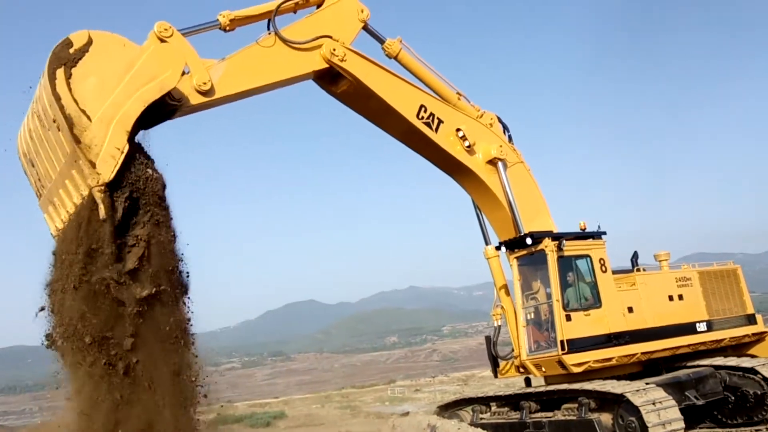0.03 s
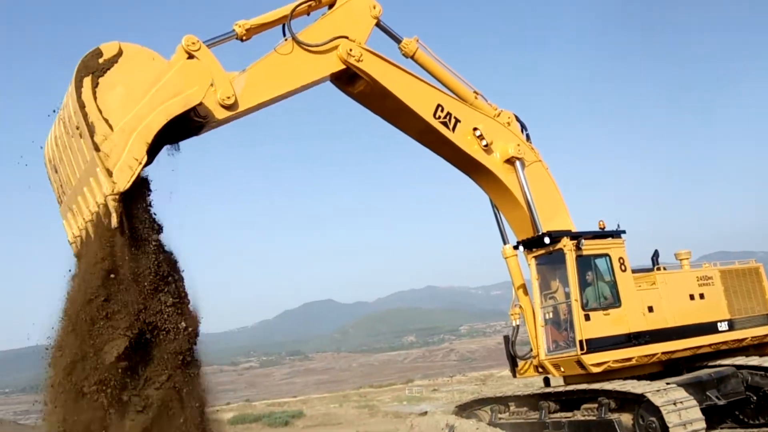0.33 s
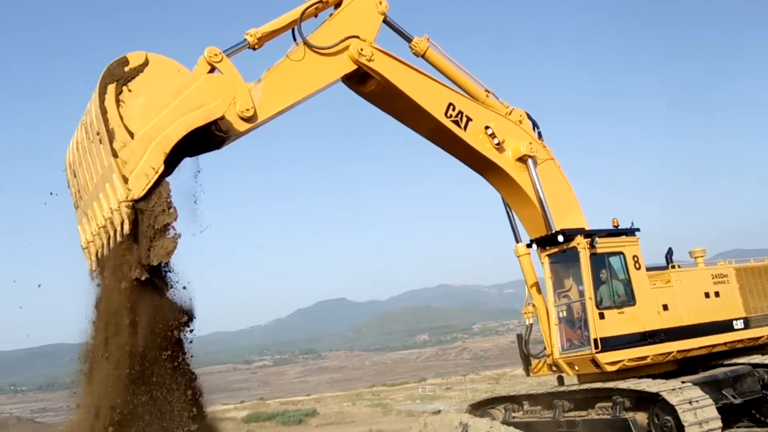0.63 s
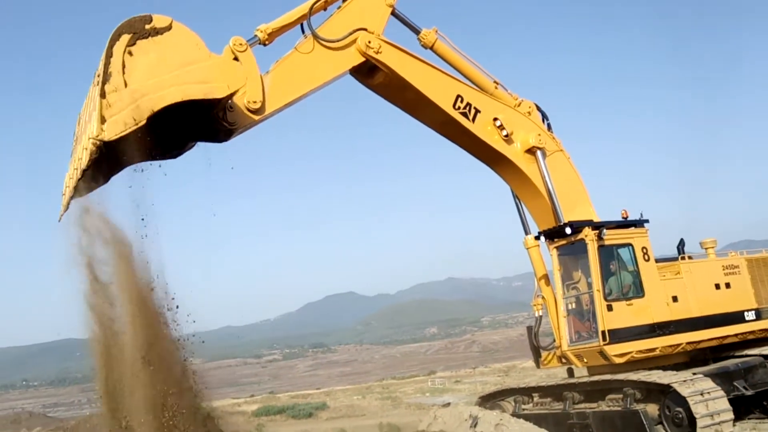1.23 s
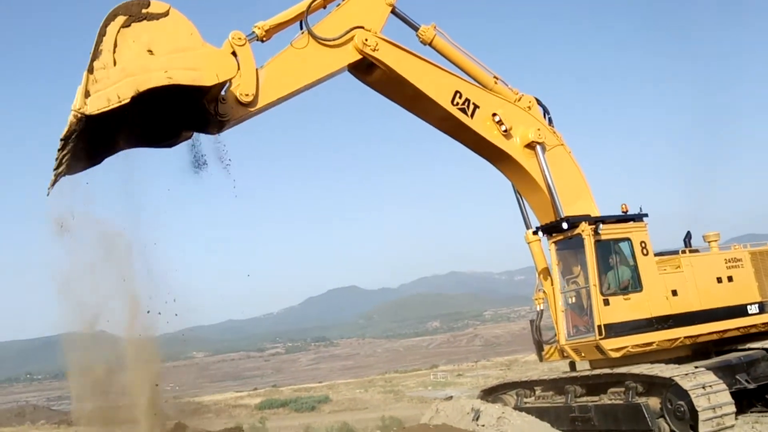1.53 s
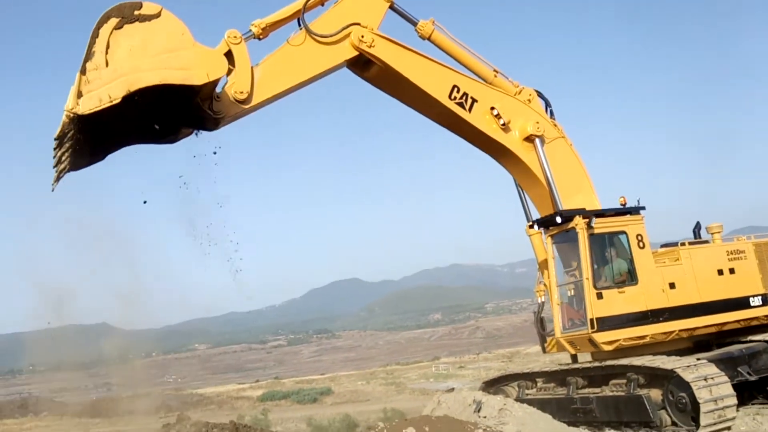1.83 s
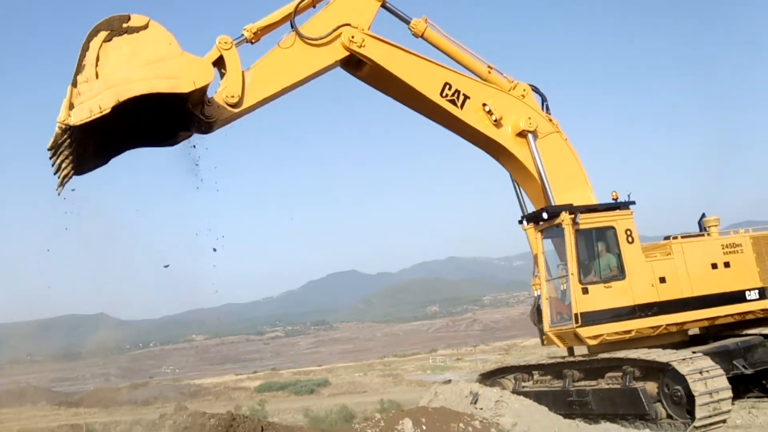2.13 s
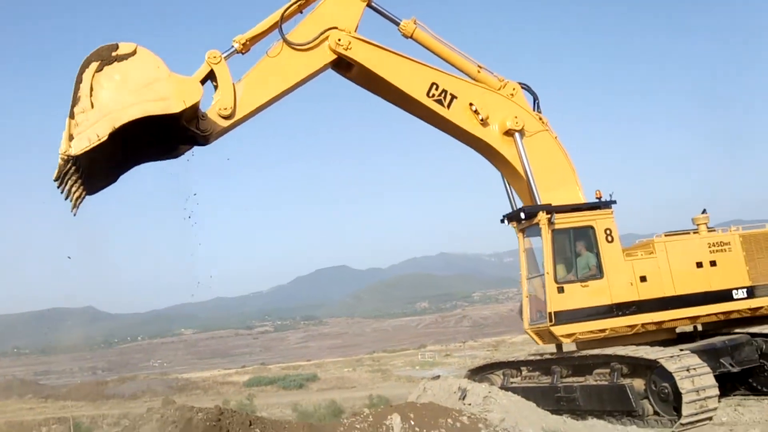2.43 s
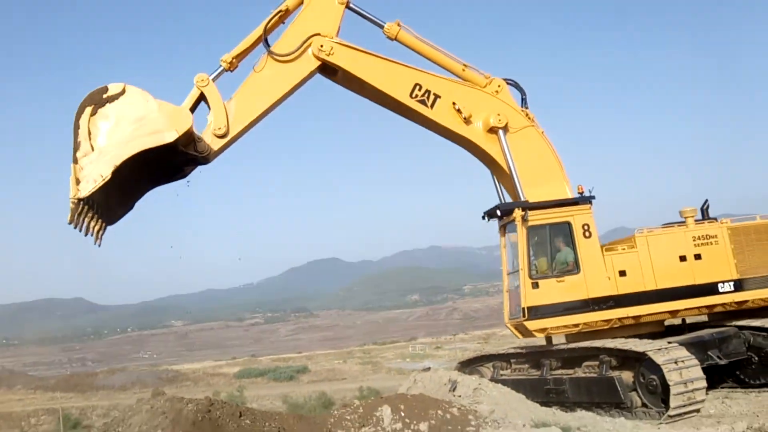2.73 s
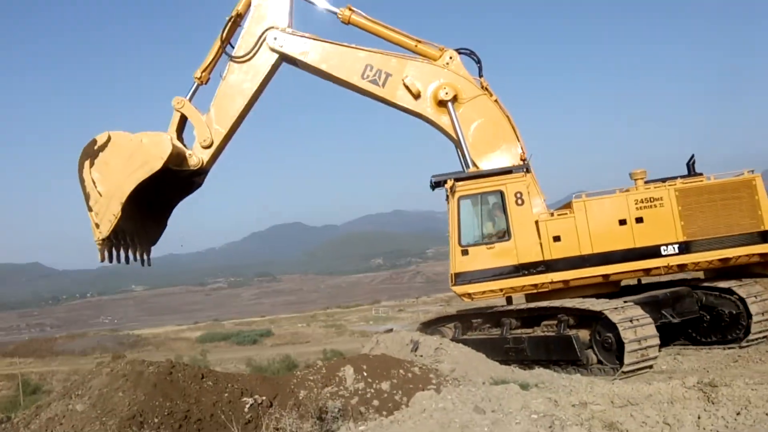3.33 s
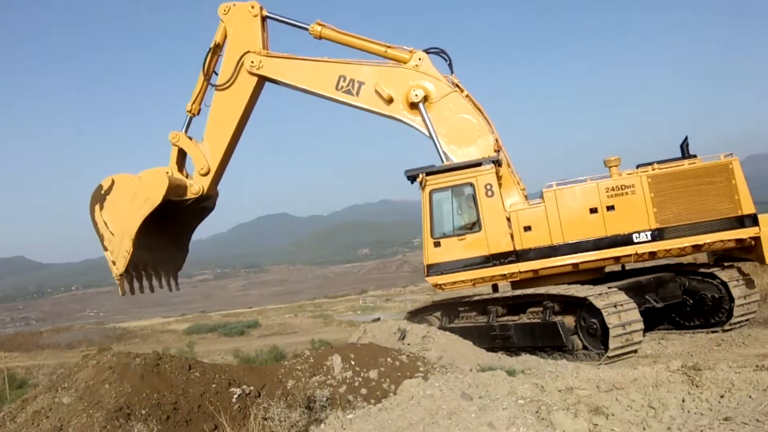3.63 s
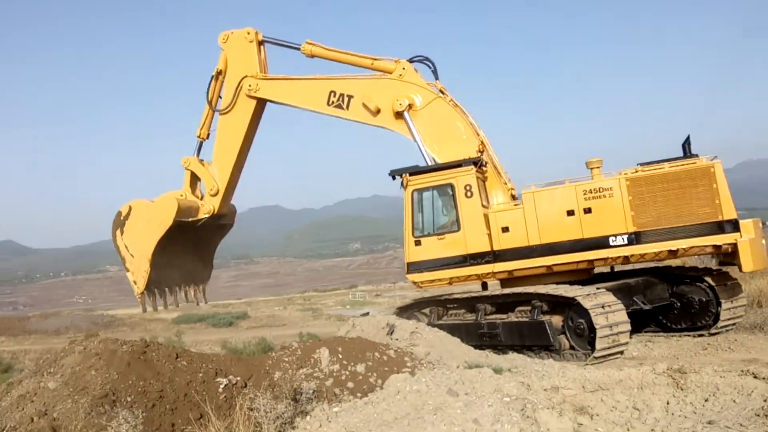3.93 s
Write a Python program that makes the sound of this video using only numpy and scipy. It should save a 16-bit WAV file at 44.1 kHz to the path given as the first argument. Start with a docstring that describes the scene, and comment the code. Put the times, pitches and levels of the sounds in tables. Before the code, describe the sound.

The steady diesel drone and metallic clatter of an excavator carry across open ground. Faint hydraulics whine, a little earth thuds down and the linkage rattles as the engine dips under load, before gusts briefly bump the microphone.

```python
"""A droning, clattering diesel, some way off: a big excavator empties its bucket and swings round.
Exhaust and cooling fan follow the engine, sagging twice under load. The clatter pulses with the firing
and brightens as the machine's side turns near. Loose panels ring, pins rattle, hydraulics whine,
earth thuds onto open ground and the turbo whistles faintly.
Light wind rumbles and thumps on the microphone, over a thin hiss."""
import sys
import numpy as np
from scipy import signal
from scipy.fft import rfft, irfft
from scipy.io import wavfile
from scipy.ndimage import uniform_filter1d

SR = 44100
rng = np.random.default_rng(int(sys.argv[2]) if len(sys.argv) > 2 else 0)


def master_out(mix):
    """Clip the mix to full scale and print it as 16-bit PCM to the path in sys.argv[1]."""
    frames = np.transpose(np.atleast_2d(mix))
    ceiling = np.clip(frames, -1, 1)
    pcm = np.round(ceiling * 32767).astype(np.int16)
    wavfile.write(sys.argv[1], SR, pcm)


N = 176400
TIME = np.arange(N) / SR

# Colour of the microphone hiss. Each row: frequency in Hz, relative level in dB.
HISS_EQ = [(100, -18), (7000, -8), (9000, -10), (13700, -12), (14300, -5.5), (14900, -1), (15400, 0),
           (15800, -4), (16500, -8)]
# Colour of the wind. Each row: frequency in Hz, relative level in dB.
WIND_EQ = [(20, -8.5), (36, -2.5), (52, 1), (72, -3.5), (110, -15.5)]
# Rise and fall of the wind. Each row: time in seconds, level in dB.
WIND_FADER = [(0, -71), (.28, -59.5), (.34, -75), (.42, -61), (.7, -66), (1.02, -65), (1.25, -76),
              (1.45, -69), (1.7, -82), (1.98, -82), (2.08, -63), (2.3, -76), (2.6, -73), (3.15, -61),
              (3.25, -72), (3.36, -60), (4, -66.5)]
# Puffs of wind hitting the microphone. Each row: time in seconds, drive in dB, build-up and collapse
# in seconds, pitch of the low swing in Hz, its 60 dB decay time in seconds.
WIND_PUFFS = [(0.386, -31.5, 0.0025, 0.0019, 85, .07), (0.891, -46, 0.004, 0.0015, 85.5, 0.028),
              (0.998, -43, 0.0018, .001, 85, .04), (3.4109, -16.5, 0.0037, 0.00041, 84.5, 0.084),
              (3.4389, -13.5, 0.0018, 0.00059, 84, 0.04), (3.4883, -17.5, .004, 0.0011, 86, 0.056),
              (3.5669, -20.5, 0.0041, 0.00078, 93, 0.046), (3.6012, -16, 0.0017, 0.00055, 96.7, 0.063),
              (3.6365, -16.5, 0.0024, 0.0016, 91.9, 0.04)]
# Colour of the turbulence in a thump. Each row: frequency in Hz, relative level in dB.
TURBULENCE_EQ = [(250, -1), (500, -3.5), (750, -8.5), (1100, -26), (1600, -39)]
# Colour of the machine's rumble. Each row: frequency in Hz, relative level in dB.
RUMBLE_EQ = [(14, -15.5), (32, -11.5), (50, -7), (85, 0), (125, -3.5), (155, -3.5), (210, -12.5),
             (250, -17.5), (380, -26.5), (600, -44)]
# Rise and fall of the rumble. Each row: time in seconds, level in dB.
RUMBLE_FADER = [(0, -62.5), (.43, -60), (.7, -65), (1.15, -62.5), (1.28, -69.5), (1.48, -63), (1.7, -66.5),
                (1.84, -63.5), (1.95, -66.5), (2.08, -62), (2.33, -63.5), (2.7, -63.5), (3.25, -64.5),
                (3.36, -59.5), (3.75, -64.5), (4, -59)]
# Earth landing. Each row: start in seconds, level in dB, pitch in Hz.
CLODS = [(0.389, -53.5, 188), (0.961, -57.5, 209)]
# A high sheen that comes up near the end. Each row: time in seconds, level in dB.
SHEEN_FADER = [(0, -108), (2.8, -102), (3.15, -97), (3.22, -84), (3.3, -97.5), (3.55, -90), (3.7, -86),
               (3.82, -92), (3.92, -85), (4, -79)]
# The turbo's whistle. Each row: time in seconds, pitch in Hz, level in dB.
TURBO_GLIDE = [(0, 8800, -109), (.3, 8440, -102), (.9, 8500, -116), (1.55, 8800, -104), (1.85, 9000, -112),
               (2.05, 9100, -101), (2.28, 9400, -108), (2.65, 8800, -104), (3, 8233, -116)]
# Whines of hydraulics and gears. Each row: centre and length in seconds, pitch in Hz, level in dB.
ARM_WHINES = [(0.044, 0.099, 1615, -72), (0.148, .25, 2760, -86), (0.438, 0.084, 1163, -73.5),
              (0.465, 0.076, 2724, -78), (0.675, 0.14, 764, -81), (0.86, 0.51, 565, -82),
              (1.0, 0.72, 1720, -73.5), (1.132, 0.12, 775, -81.5), (1.27, 0.13, 1357, -73),
              (1.34, 0.07, 1141, -73.5), (1.386, 0.086, 528, -69.5), (1.385, 0.13, 590, -73),
              (1.974, 0.081, 603, -73.5), (2.034, 0.16, 2659, -80), (2.02, 0.2, 2160, -73.5),
              (2.09, .09, 517, -74.5), (2.525, 0.28, 1646, -66.5), (2.62, 0.15, 2724, -77.5),
              (2.849, 0.27, 780, -79), (2.93, 0.21, 2649, -76), (3.017, 0.13, 2358, -76),
              (3.11, .17, 580, -71.5), (3.292, 0.063, 2842, -75), (3.32, 0.11, 2659, -78),
              (3.367, 0.15, 690, -69), (3.47, 0.076, 1163, -69), (3.796, 0.14, 1184, -76),
              (3.87, 0.36, 585, -74), (3.92, 0.083, 1647, -67.5)]
# Rattles of the linkage. Each row: start in seconds, level in dB, pitch in Hz.
PIN_RATTLES = [(1.7, -61, 1600), (1.735, -64.5, 1850), (2.29, -69.5, 2650), (2.315, -61.5, 1750)]
# Ringing modes of loose panels and links. Each row: pitch in Hz, relative level in dB.
PANEL_RINGS = [(1160, -5), (1355, 1), (1630, -3), (1740, -1), (1890, -3.5), (2110, -2), (2660, -3.5),
               (2775, -9)]
# Engine speed, sagging twice. Each row: time in seconds, firing rate in Hz.
FIRING_RATE = [(0, 192.2), (0.35, 193.3), (0.8, 190.4), (1, 189), (1.2, 185.4), (1.38, 177.9),
               (1.55, 179.8), (1.8, 185), (2.1, 175.5), (2.45, 185.9), (2.75, 189.6), (3.1, 193.8),
               (3.6, 195.1), (4, 198.1)]
# Rise and fall of the fan tone. Each row: time in seconds, level in dB.
FAN_FADER = [(0, -56), (.5, -56), (.95, -57.5), (1.18, -57), (1.26, -63), (1.42, -62.5), (1.49, -54),
             (1.61, -64), (1.76, -59.5), (1.83, -53.5), (1.92, -65.5), (2.19, -55), (2.3, -61),
             (2.48, -54.5), (2.75, -57.5), (3.1, -56), (4, -58)]
# The exhaust's chord. Each row: multiple of the firing rate, level in dB before the swell.
EXHAUST_PARTIALS = [(.5, -80.5), (1, -66), (1.5, -82), (2, -87.5), (3.35, -93.5), (4, -90)]
# Swell of the exhaust. Each row: time in seconds, gain in dB.
EXHAUST_FADER = [(0, -2), (.5, 0.5), (1.05, 1), (1.4, -4.5), (1.8, -1.5), (2.2, -5), (2.6, -1), (2.95, 3.5),
                 (3.3, 0), (4, 2)]
# Drive of clatter and panels, dipping twice near the end. Each row: time in seconds, base level in dB.
SHAKE_FADER = [(0, -66), (.45, -67), (.55, -66.5), (.75, -67), (1.25, -66.5), (1.45, -66.5), (1.66, -66.5),
               (1.75, -65.5), (1.9, -66.5), (2.2, -65), (2.65, -65), (2.9, -65), (3.415, -63.5),
               (3.435, -66.5), (3.46, -67.5), (3.485, -63.5), (3.595, -62.5), (3.64, -66), (3.7, -62.5),
               (4, -64)]
# Colour of the clatter from the front. Each row: frequency in Hz, relative level in dB.
FRONT_EQ = [(210, -33), (350, -6), (378, -5.5), (424, -9), (470, -11.5), (534, -6), (615, -8.5),
            (775, -9.5), (916, -14), (1140, -1.5), (1240, -4.5), (1350, 1), (1480, -0.5), (1730, 1.5),
            (1960, -4), (2160, -5), (2370, -9), (2620, -9), (2770, -6), (3060, -19), (3660, -21.5),
            (5880, -22), (7500, -31.5), (9750, -86), (16500, -120)]
# Colour of the clatter from the side. Each row: frequency in Hz, relative level in dB.
SIDE_EQ = [(210, -43), (350, -8), (393, -8.5), (430, -8.5), (464, -4.5), (521, -12), (585, -1.5),
           (639, -3.5), (785, -5.5), (881, -19), (964, -5.5), (1150, 0), (2030, -2), (2760, -11),
           (2940, -11), (3430, -25), (4160, -25.5), (5170, -23), (7500, -34), (9750, -75), (16500, -120)]
# The clatter's bright edge, dulling during the late thumps. Each row: time in seconds, gain in dB.
EDGE_FADER = [(0, -.5), (2.2, -1), (3.33, 3.5), (3.45, -3), (3.63, -5.5), (3.75, 3.5), (4, 3)]


def from_db(db):
    """Decibels to gain."""
    return 10 ** (np.asarray(db) / 20)


def rms_one(x):
    """Scale to an rms of 1."""
    return x / np.sqrt(np.mean(x ** 2) + 1e-20)


def automation(rows):
    """One curve per column after the time, drawn through every sample."""
    times, *columns = np.transpose(rows)
    return [np.interp(TIME, times, column) for column in columns]


def coloured(x, eq):
    """Shape x with an EQ curve that falls steeply beyond its ends; rms 1."""
    hz, db = np.transpose(eq)
    freqs = np.maximum(np.fft.rfftfreq(N, 1 / SR), 1)
    skirts = np.minimum(freqs / hz[0], 1) ** 4 * np.minimum(hz[-1] / freqs, 1) ** 8
    gain = from_db(np.interp(np.log(freqs), np.log(hz), db))
    return rms_one(irfft(rfft(x) * skirts * gain, N))


def drift(rate_hz):
    """A smooth random wobble with a spread of 1."""
    hop, settle = 40, 2000
    pole = np.exp(-2 * np.pi * hop * rate_hz / SR)
    noise = rng.standard_normal(N // hop + settle + 2)
    slow = signal.lfilter([1], [1, -2 * pole, pole * pole], noise)[settle:]
    return np.interp(np.arange(N) / hop, np.arange(len(slow)), rms_one(slow))


def running_phase(hz):
    """Phase of a pitch curve in radians, from a random start."""
    return 2 * np.pi * (np.cumsum(hz * np.ones(N)) / SR + rng.random())


def whistle(hz, width_hz):
    """A narrow band of noise around a pitch; rms about 1."""
    phase = running_phase(hz)
    return drift(width_hz) * np.cos(phase) + drift(width_hz) * np.sin(phase)


def poles(hz, t60):
    """Feedback terms of a resonance that dies by 60 dB in t60 seconds."""
    radius = from_db(-60 / (t60 * SR))
    return np.array([1, -2 * radius * np.cos(2 * np.pi * hz / SR), radius * radius])


def hiss(level_db=-86.5):
    """The microphone's own thin, steady noise."""
    return from_db(level_db) * coloured(rng.standard_normal(N), HISS_EQ)


def wind(gust_db=2):
    """Gusts on the microphone rumble at the very bottom."""
    level_db, = automation(WIND_FADER)
    return from_db(level_db + gust_db * drift(8)) * coloured(rng.standard_normal(N), WIND_EQ)


def puff(time, db, build_up, collapse, hz, t60):
    """Air pressure builds and collapses; the microphone answers with a damped low swing."""
    pressure = from_db(db) * np.exp(-np.logaddexp((time - TIME) / build_up, (TIME - time) / collapse))
    return signal.lfilter([1, -2, 1], poles(hz, t60), pressure + 1e-18 * rng.standard_normal(N))


def wind_thumps(turbulence_db=-46.5):
    """Puffs pass the microphone's upper resonance; turbulence grows with the square of the swing."""
    swing = sum(puff(*row) for row in WIND_PUFFS)
    upper = poles(hz=243, t60=0.015)
    body = signal.lfilter([upper.sum()], upper, swing)
    force = uniform_filter1d(swing ** 2, size=400)
    turbulence = coloured(rng.standard_normal(N), TURBULENCE_EQ)
    return body + from_db(turbulence_db) * force / force.max() * turbulence


def rumble(wobble_db=2):
    """The machine's lumpy bed of low noise."""
    level_db, = automation(RUMBLE_FADER)
    return from_db(level_db + wobble_db * drift(4.8)) * coloured(rng.standard_normal(N), RUMBLE_EQ)


def earth_thuds(t60=0.1):
    """Clods of earth land with a short dull ring."""
    out = 0
    for start, db, hz in CLODS:
        age = np.maximum(TIME - start, 0)
        out += np.sqrt(2) * from_db(db - 60 * age / t60) * np.sin(2 * np.pi * hz * age)
    return out


def sheen():
    """A narrow band of treble flickers up near the end."""
    level_db, = automation(SHEEN_FADER)
    return from_db(level_db) * whistle(hz=5110, width_hz=160)


def turbo():
    """The turbo's thin whistle wanders in pitch and falls away."""
    hz, level_db = automation(TURBO_GLIDE)
    return from_db(level_db) * whistle(hz, width_hz=33)


def hydraulics():
    """Short whines swell and fade as the arm works."""
    out = 0
    for centre, length, hz, db in ARM_WHINES:
        swell = np.exp(-2 * ((TIME - centre) / length) ** 2)
        out += from_db(db) * swell * whistle(hz, width_hz=24.7)
    return out


def rattles(t60=0.24):
    """Short noisy rings as the pins take up their play."""
    out = 0
    for start, db, hz in PIN_RATTLES:
        decay = from_db(db - 60 * np.maximum(TIME - start, 0) / t60) * (TIME >= start)
        out += decay * coloured(whistle(hz, width_hz=340), eq=[(1000, 0), (2600, 0)])
    return out


def panels(taps_per_s=14, spread_db=1, trim_db=-13.5):
    """Engine shake taps each mode of the loose metal at random; every tap rings briefly."""
    shake_db, = automation(SHAKE_FADER)
    metal = 0
    for hz, db in PANEL_RINGS:
        taps = (rng.random(N) < taps_per_s / SR) * from_db(spread_db * rng.standard_normal(N))
        ring = signal.lfilter([1, 0, -1], poles(hz, t60=0.09), taps + 1e-18)
        metal += from_db(db) * rms_one(ring)
    mids = signal.butter(2, [1000, 3000], "band", fs=SR, output="sos")
    return from_db(shake_db + trim_db) * signal.sosfilt(mids, metal)


def fan(firing_hz, blades_per_firing=0.568, waver=0.011, flutter_db=1.5):
    """The wavering blade tone of the cooling fan, geared to the engine."""
    level_db, = automation(FAN_FADER)
    blade_phase = running_phase(firing_hz * blades_per_firing * (1 + waver * drift(5.46)))
    return np.sqrt(2) * from_db(level_db + flutter_db * drift(20)) * np.sin(blade_phase)


def exhaust(firing_phase, flutter_db=1.5):
    """A drone of tones locked to the firing, each fluttering on its own."""
    swell_db, = automation(EXHAUST_FADER)
    drone = 0
    for multiple, db in EXHAUST_PARTIALS:
        gain = from_db(db + flutter_db * drift(5.4))
        drone += gain * np.sin(multiple * firing_phase + rng.uniform(0, 2 * np.pi))
    return np.sqrt(2) * from_db(swell_db) * drone


def housing_resonances(x, low_hz=500, high_hz=3100, step_hz=70, swell_db=1.6):
    """Narrow neighbouring resonances of the housing swell and fade, each on its own."""
    spectrum, freqs = rfft(x), np.fft.rfftfreq(N, 1 / SR)
    out = x
    for hz in np.arange(low_hz, high_hz, step_hz):
        band = irfft(spectrum * np.maximum(1 - abs(freqs - hz) / step_hz, 0), N)
        swell = rms_one(from_db(swell_db * drift(2.6)))
        out = out + (swell - 1) * band
    return out


def bright_edge(x):
    """Lift or dull the bite at the top of the clatter."""
    gain_db, = automation(EDGE_FADER)
    bite = signal.sosfiltfilt(signal.butter(2, [2430, 3000], "band", fs=SR, output="sos"), x)
    return x + (from_db(gain_db) - 1) * bite


def clatter(firing_phase, pulse_depth=0.15, knock_spread_db=0.4, flicker_db=0.7, trim_db=0.5):
    """Noise pulses unevenly, once per firing, coloured by the housing as it turns from front to side."""
    shake_db, = automation(SHAKE_FADER)
    firing_index = (firing_phase / (2 * np.pi)).astype(int)
    knock_db = knock_spread_db * rng.standard_normal(N)[firing_index]
    pulses = (1 - pulse_depth * np.cos(firing_phase)) * from_db(knock_db)
    knocks = housing_resonances(rng.standard_normal(N) * pulses)
    turn_start_s, turn_end_s = 1.66, 3.4
    turned = np.interp(TIME, [turn_start_s, turn_end_s], [0, 1])
    housing = (1 - turned) * coloured(knocks, FRONT_EQ) + turned * coloured(knocks, SIDE_EQ)
    return from_db(shake_db + trim_db + flicker_db * drift(24)) * bright_edge(housing)


def scene():
    """The mono mix: the machine and falling earth, with wind and hiss on the microphone."""
    firing_hz, = automation(FIRING_RATE)
    firing_phase = running_phase(firing_hz)
    treble = sheen()
    engine = exhaust(firing_phase) + fan(firing_hz) + clatter(firing_phase)
    machine = engine + hydraulics() + rattles() + panels() + turbo() + treble
    return (machine + earth_thuds() + rumble() + wind() + wind_thumps() + hiss())[None]


def record(dry):
    """A steep low-pass takes off the very top."""
    cutoff_hz = 15800
    return signal.sosfilt(signal.ellip(12, .1, 70, cutoff_hz, fs=SR, output="sos"), dry)


dry = scene()
out = record(dry)
master_out(out)
```